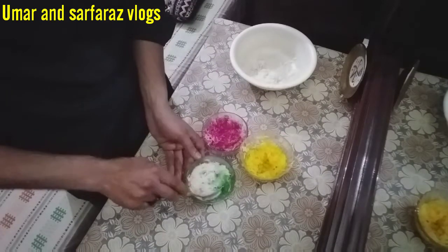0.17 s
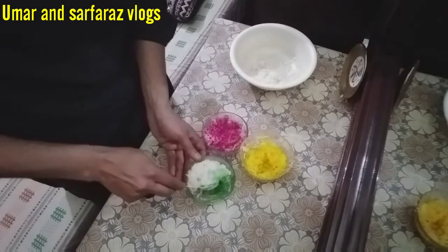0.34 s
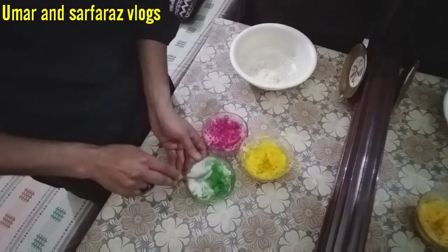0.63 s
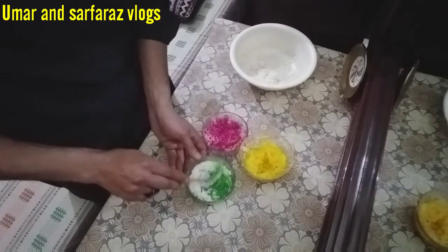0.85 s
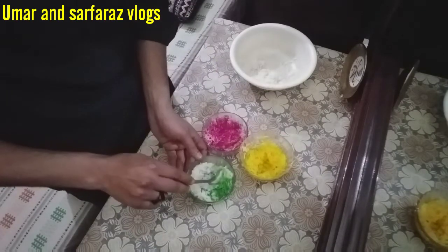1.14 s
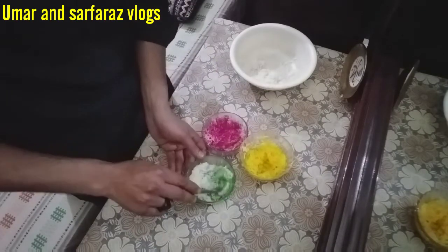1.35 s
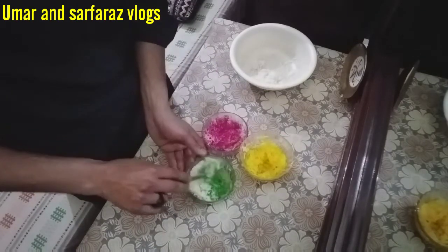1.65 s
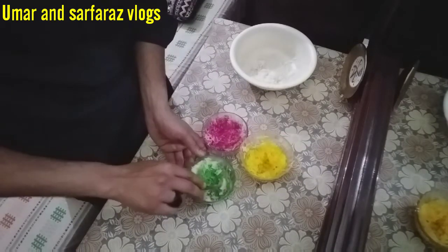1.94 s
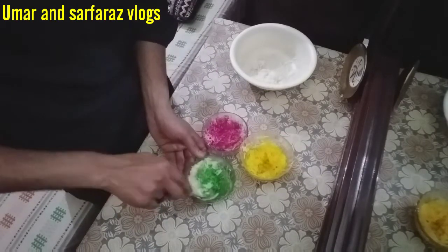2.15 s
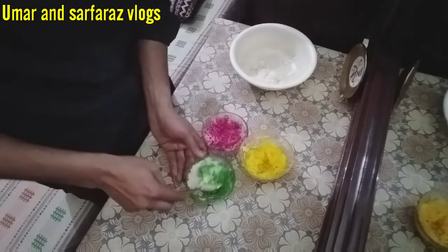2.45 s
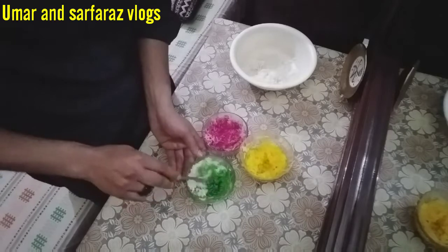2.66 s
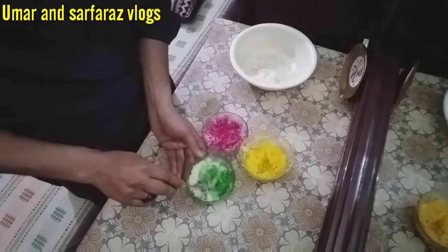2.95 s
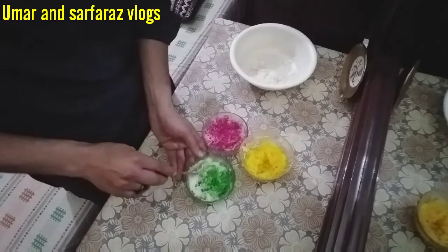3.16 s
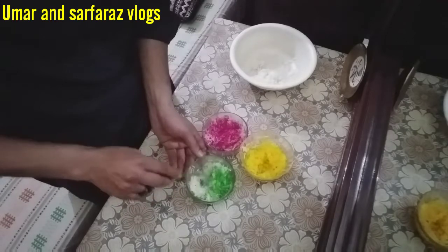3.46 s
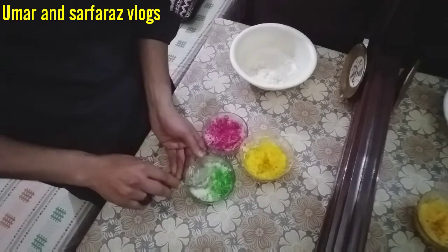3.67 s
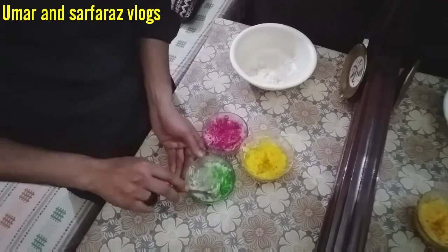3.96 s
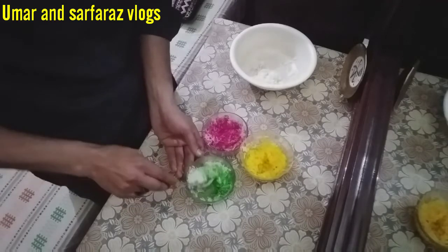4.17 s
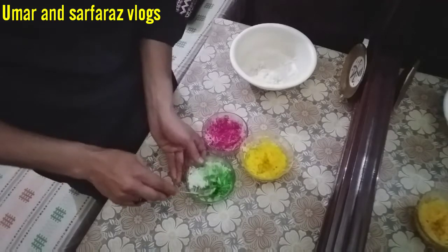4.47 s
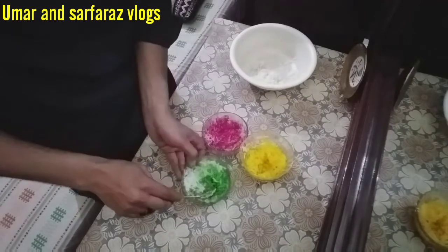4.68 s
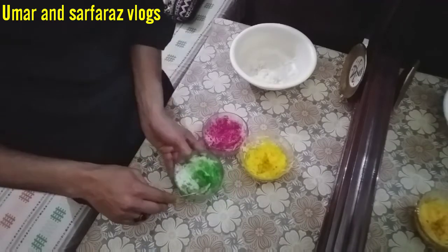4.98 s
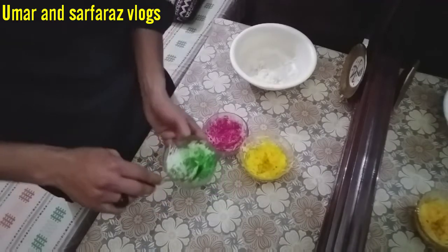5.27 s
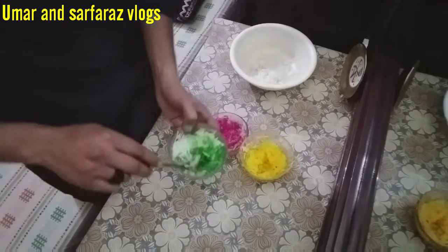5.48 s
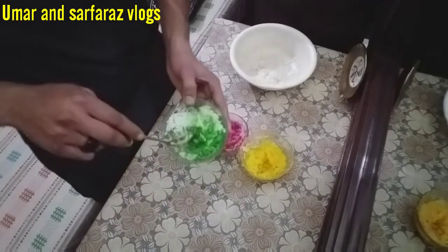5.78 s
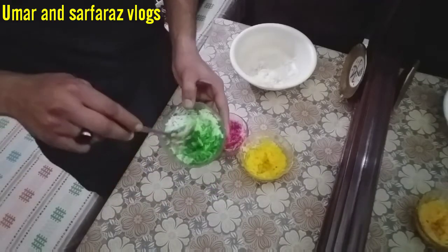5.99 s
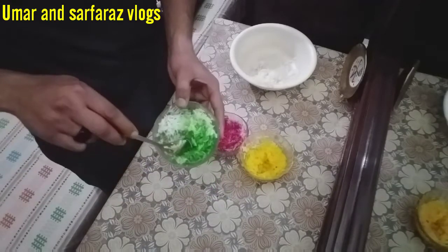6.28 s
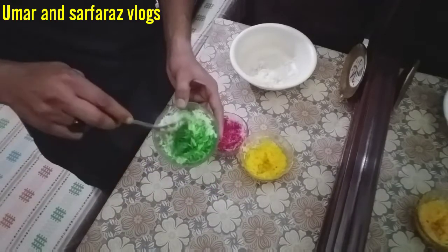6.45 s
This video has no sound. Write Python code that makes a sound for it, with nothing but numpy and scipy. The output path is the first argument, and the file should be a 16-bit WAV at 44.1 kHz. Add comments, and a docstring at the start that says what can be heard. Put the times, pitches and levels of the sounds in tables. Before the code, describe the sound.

In a small kitchen with a faint hiss and low rumble, a metal spoon clicks and clinks irregularly against a glass bowl of rice. Early on, the bowl rubs softly over a tablecloth. The clinks peak in a bright pair as glass touches glass. Then come another clink, a muffled knock on the table, brief ringing scrapes and a final sharp tap, all heard nearby with a short room echo.

```python
"""Stirring rice in a glass bowl

A steel spoon stirs rice in a small glass bowl on a cloth-covered table in a small kitchen.
Each touch cracks, rings the glass and knocks the table. The bowl is nudged over the cloth, bumps
the table and clinks against its neighbour; then it is lifted while the spoon drags along it.
A steady hiss and a low rumble lie underneath."""
import sys
import numpy as np
from scipy import signal
from scipy.fft import rfft, irfft
from scipy.io import wavfile

SR = 44100
rng = np.random.default_rng(int(sys.argv[2]) if len(sys.argv) > 2 else 0)


def put_to_file(sound):
    """Save the sound as 16-bit audio at rate SR, in the file named by the first command-line argument."""
    columns = np.atleast_2d(sound).T  # one column per channel
    safe = np.clip(columns, -1, 1)
    whole_steps = np.round(safe * 32767)
    wavfile.write(sys.argv[1], SR, whole_steps.astype(np.int16))


N = 291942
T = np.arange(SR // 2) / SR  # time axis of one hit, in seconds
ATTACK = SR // 125  # the first 8 ms of a hit, in samples


def amp(db):
    """Decibels to gain."""
    return 10 ** (np.asarray(db) / 20)


def curve_at(points, hz):
    """A curve of straight lines over log frequency, read at hz."""
    freqs, values = np.transpose(points)
    return np.interp(np.log(hz + 1), np.log(freqs + 1), values)


def unit_rms(x):
    """Scales to rms 1."""
    return x / np.sqrt(np.mean(x ** 2) + 1e-20)


def unit_attack(x):
    """Scales to rms 1 over the attack."""
    return x / np.sqrt(np.mean(x[:ATTACK] ** 2) + 1e-20)


def add(mix, start_s, sound):
    """Mixes a sound in at start_s."""
    part = mix[round(start_s * SR):][:len(sound)]
    part += sound[:len(part)]


def swell(peak_s, rise_s, fall_s):
    """An envelope that grows to 1 at peak_s and dies away."""
    t = np.arange(N) / SR - peak_s
    return np.exp(np.maximum(np.minimum(t / rise_s, -t / fall_s), -30))


def colour(x, spectrum, size=4096):
    """Minimum-phase EQ: shapes the tone with no ringing ahead of a hit."""
    log_gain = np.log(amp(curve_at(spectrum, abs(np.fft.fftfreq(size, 1 / SR)))))
    taps = np.fft.ifft(np.exp(np.conj(signal.hilbert(log_gain)))).real[:size // 2]
    return signal.fftconvolve(x, taps)[:len(x)]


def burst(spectrum, decay_s):
    """The chatter of a contact: coloured noise that dies within milliseconds."""
    return unit_attack(colour(rng.standard_normal(len(T)) * np.exp(-T / decay_s), spectrum))


def ring(modes, rise_s, length=1, scatter_db=1):
    """Dying modes, their t60 scaled by length; where the blow lands sets each one's share."""
    hz, db, t60 = np.transpose(modes)[:, :, None]
    share, phase = rng.uniform(-1, 1, hz.shape), rng.random(hz.shape)
    onset = 1 - np.exp(-T / rise_s)
    envelopes = onset * amp(db + scatter_db * share - 60 * T / (t60 * length))
    attack_power = (envelopes[:, :ATTACK] ** 2).mean(1).sum() / 2
    return (envelopes * np.sin(2 * np.pi * (hz * T + phase))).sum(0) / np.sqrt(attack_power)


# Reverb time of the kitchen: freq_hz, t60_s
ROOM_DECAY = [(150, .35), (500, 0.35), (1400, 0.34), (3700, 0.26), (7000, 0.23), (14000, 0.28)]

def kitchen(x, wet_db, predelay_s=0.0064, build_s=0.00064):
    """Adds dense reflections from near walls; their pattern changes as hand and bowl move."""
    hz, t, noise = signal.stft(rng.standard_normal(len(T)), SR, nperseg=256)
    decay = amp(-60 * t / curve_at(ROOM_DECAY, hz)[:, None])
    tail = signal.istft(noise * decay, SR, nperseg=256)[1][:len(T)]
    tail *= 1 - np.exp(-np.maximum(T - predelay_s, 0) / build_s)
    return x + amp(wet_db) * signal.fftconvolve(x, tail / np.linalg.norm(tail))[:len(x)]


# Bed of hiss and rumble: freq_hz, level_db
HISS_SPECTRUM = [(25, -25.5), (50, -13), (100, -1.5), (170, -10.5), (420, -16), (800, -15), (1300, -15),
                 (1650, -12.5), (2050, -4.5), (2900, -2.5), (4000, -7), (7600, -14), (9000, -23.5),
                 (16000, -26)]
# Narrow bands of hum and whine in the bed: centre_hz, width_hz, level_db
HISS_HUMPS = [(110, 51, -69), (2692, 180, -61), (3146, 98, -64.5), (3260, 18, -63.5)]

def hiss(sag_db=-3, sag_at_s=4.41, sag_width_s=0.58):
    """Steady hiss and rumble with a few narrow humps; the level sinks once and comes back."""
    hz, t = np.fft.rfftfreq(N, 1 / SR), np.arange(N) / SR

    def noise(gain):
        return unit_rms(irfft(rfft(rng.standard_normal(N)) * gain, N))

    wide = noise(amp(curve_at(HISS_SPECTRUM, hz)))
    humps = sum(amp(level_db) * noise(1 / (1 + (2 * (hz - centre_hz) / width_hz) ** 2))
                for centre_hz, width_hz, level_db in HISS_HUMPS)
    sag = amp(sag_db * np.exp(-((t - sag_at_s) / sag_width_s) ** 2))
    return sag * (amp(-58.5) * wide + amp(-2.5) * humps)


# Nudges of the bowl: peak_s, level_db
NUDGES = [(0.59, -40.5), (0.647, -41), (0.728, -45.5), (0.82, -57)]
# Muffled rub of glass on cloth: freq_hz, level_db
CLOTH_SPECTRUM = [(40, -32), (90, 8.5), (130, 12.5), (190, -3), (300, -2.5), (420, -20), (700, -49),
                  (3000, -73)]

def cloth_rub():
    """The bowl's foot judders over the cloth with each nudge."""
    envelope = sum(amp(db) * swell(peak_s, rise_s=0.016, fall_s=0.021) for peak_s, db in NUDGES)
    return amp(-6) * envelope * unit_rms(colour(rng.standard_normal(N), CLOTH_SPECTRUM))


# Low resonances of the table top: pitch_hz, level_db, t60_s
TABLE_MODES = [(121, -13, .22), (166, -9, .13), (200, -9, .1), (243, -5, .12), (279, 1, .19),
               (366, -10, .12), (408, -9, .1), (560, -13, .06), (630, -12, .08)]

def table_knock(length=1):
    """The table top answers a blow with a soft-edged knock."""
    return ring(TABLE_MODES, rise_s=0.002, length=length)


# The bowl bumping the table: start_s, level_db, contact_s
BUMPS = [(1.682, -39, 0.0047), (5.106, -33, 0.0011), (5.11, -20, 0.0019), (5.677, -59, 0.0052)]
# Tone of a thud: freq_hz, level_db
THUD_SPECTRUM = [(30, -41.5), (70, -13), (120, -9), (180, -1), (280, -4.5), (420, -7), (600, -7.5),
                 (900, -13), (2000, -18), (8000, -95)]

def bowl_bumps():
    """Thuds through the cloth: a push, a judder, the table's ring; longer contacts sound duller."""
    out = np.zeros(N)
    push = unit_attack(colour(signal.unit_impulse(len(T)), THUD_SPECTRUM))
    for start_s, level_db, contact_s in BUMPS:
        judder = amp(-9) * burst(THUD_SPECTRUM, decay_s=0.009)
        thud = push + judder + amp(-5) * table_knock(length=0.7)
        band = signal.butter(2, [70, 1 / contact_s], "bandpass", fs=SR)
        muffled = unit_attack(signal.lfilter(*band, thud))
        add(out, start_s, kitchen(amp(level_db) * muffled, wet_db=-9))
    return out


# Ring of the neighbouring bowl: pitch_hz, level_db, t60_s
NEIGHBOUR_MODES = [(2465, 0, .19), (3475, -3, .15), (4740, 0, .22), (4990, -5, .2), (6440, -8, .1)]
# Bowl against bowl: start_s, level_db, favoured_hz
TOUCHES = [(1.617, -39, 5200), (3.731, -25.5, 3340), (5.0685, -23.5, 3240)]

def neighbour_bowl(octave_away_db=-16):
    """The bowl is knocked into its neighbour; the point of contact favours modes near one pitch."""
    out = np.zeros(N)
    for start_s, level_db, favoured_hz in TOUCHES:
        modes = [(hz, db + octave_away_db * np.log2(hz / favoured_hz) ** 2, t60)
                 for hz, db, t60 in NEIGHBOUR_MODES]
        glass = amp(level_db) * ring(modes, rise_s=0.0006, length=0.4)
        add(out, start_s, kitchen(glass, wet_db=-5.5))
    return out


# The rice bowl's three main modes, each a close cluster, and its top shimmer: pitch_hz, level_db, t60_s
GLASS_LOW = [(2409, 0, .22), (2436, -12, .15), (2360, -8, .04)]
GLASS_MID = [(4535, 0, .2), (4580, -3, .16), (4640, -1, .035), (4800, -5, .04)]
GLASS_HIGH = [(6778, 0, .21), (6878, -7, .18), (6700, -1, .04)]
GLASS_SHIMMER = [(8400, -2, .12), (9250, -1, .11), (10660, -2, .11), (12130, 1, .13), (12310, -6, .1),
                 (14550, -8, .1), (15430, -12, .1)]

def glass_ring(ring_db, tilt_db, treble_db, length):
    """The struck bowl rings and beats, only briefly while the spoon stays on it."""
    clusters = [(GLASS_LOW, -1 - tilt_db), (GLASS_MID, 1.5), (GLASS_HIGH, -3 + tilt_db)]
    body = sum(amp(ring_db + db) * ring(modes, rise_s=0.0006, length=length) for modes, db in clusters)
    # only a hard blow on the free rim wakes the highest modes
    shimmer_db = -7.5 + (treble_db + ring_db + tilt_db) / 2
    return body + amp(shimmer_db) * ring(GLASS_SHIMMER, rise_s=0.0005, length=length, scatter_db=5)


# The hard contact in three registers, from body to sizzle: freq_hz, level_db
LOW_CRACK_SPECTRUM = [(60, -39), (300, -19.5), (650, 1.5), (1100, -10), (1550, 4), (1900, -6),
                      (2800, -35.5), (6000, -39.5)]
CRACK_SPECTRUM = [(1500, -15), (2200, -0.5), (3300, -0.5), (4700, 4), (5600, -4), (7000, 1.5), (8300, -7),
                  (9200, -43), (16000, -26)]
FIZZ_SPECTRUM = [(5000, -17.5), (8000, 1), (11000, -2.5), (16000, -9.5)]
# Ring of the spoon, damped by the fingers: pitch_hz, level_db, t60_s
SPOON_MODES = [(1500, -17, .025), (1740, -14, .025), (2560, -3, .02), (3270, -1, .022), (4090, -6, .012),
               (4720, 0, .022), (5400, -6, .018), (6420, -3, .022), (7700, -6, .02)]

def contact_crack(force_db, treble_db, knock_db):
    """The crack of a hit on glass, with a brief ring of steel; duller where rice cushions the blow."""
    chatter_s = 0.0032 * 2 ** ((force_db + 32) / 19)  # a harder blow chatters longer
    low_db = -14 + 0.58 * force_db + 0.16 * (force_db + knock_db)
    crack = amp(force_db + 1) * burst(CRACK_SPECTRUM, chatter_s)
    crack += amp(low_db) * burst(LOW_CRACK_SPECTRUM, 1.58 * chatter_s)
    fizz = amp(force_db + treble_db - 2) * burst(FIZZ_SPECTRUM, 1.3 * chatter_s)
    steel = amp(force_db - 3.5) * ring(SPOON_MODES, rise_s=0.0002, scatter_db=5)
    cutoff_hz = np.clip(4200 * 2 ** ((treble_db + 20.5) / 6.5), 1000, 20000)
    rice_cushion = signal.butter(2, cutoff_hz, fs=SR)
    return signal.lfilter(*rice_cushion, crack + steel) + fizz


# Scrapes of the spoon in the lifted bowl: peak_s, level_db, rise_s
SCRAPES = [(5.463, -39, 0.013), (5.608, -44.5, 0.042), (5.648, -41.5, 0.011), (5.734, -43, 0.01),
           (5.785, -46, 0.0023), (5.894, -44, 0.0094)]

def spoon_drag(slips_per_s=350):
    """Tiny slips of the spoon keep the glass faintly ringing."""
    envelope = sum(amp(db) * swell(peak_s, rise_s, fall_s=0.009) for peak_s, db, rise_s in SCRAPES)
    slips = unit_rms(rng.standard_normal(N) * (rng.random(N) < slips_per_s / SR))
    clusters = [(GLASS_LOW, -5), (GLASS_MID, 0), (GLASS_HIGH, -1.5), (GLASS_SHIMMER, -8)]
    tick = sum(amp(db) * ring(modes, rise_s=0.0005, length=0.35) for modes, db in clusters)
    tick += amp(7.5) * burst(CRACK_SPECTRUM, decay_s=0.0045)
    tick += amp(-23) * burst(FIZZ_SPECTRUM, decay_s=0.0027)
    return amp(-3) * signal.fftconvolve(slips * envelope, tick / np.linalg.norm(tick))[:N]


# Sharp hits on the glass bowl, from the spoon or the neighbouring bowl:
# start_s, force_db, treble_db, ring_db, tilt_db, knock_db, length_ratio
# Treble, ring and knock are relative to the force; a positive tilt brightens the ring.
CLINKS = [(0.2296, -29, -2.5, 7, -0.5, -10, 0.18), (0.2487, -36.5, -8, -20, 0, -10, 0.28),
          (1.091, -39, -7.5, 5, -6.5, -12.5, 0.79), (1.5893, -27, -5.5, -6, -9.5, -10, 0.37),
          (1.617, -27.5, -13, -28, 2, -17, 0.59), (1.6858, -42.5, -18, -26, -5, -3.5, .5),
          (2.1133, -29.5, -4.5, -5, -9.5, -7.5, 0.38), (2.2322, -47.5, -10.5, -12, -13, -0.5, 0.56),
          (2.404, -55, -4.5, 4.5, -1, -35, 0.12), (3.0058, -31.5, -21.5, -21, -4.5, -19, 0.34),
          (3.3984, -25, -19.5, -9.5, -2.5, -20.5, .25), (3.455, -35.5, -24.5, -18, -13, -9, 0.11),
          (3.7018, -21, -6.5, 1.5, 3.5, -21.5, 0.37), (3.731, -18, -17, -10, 8, -37.5, 0.39),
          (4.2694, -29.5, -21, -19, -1, -20.5, .4), (5.0648, -29, -16, -11, 10, -11, 0.24),
          (5.0684, -27, -10.5, -9.5, 5, -15.5, 0.44), (5.4179, -36.5, -3.5, 3.5, 0, -37, 0.2),
          (5.6082, -54, -2.5, 8.5, 1, -25, 0.26), (6.262, -23.5, -9.5, 3, -1, -38.5, 0.2),
          (6.357, -47, -7, 6.5, -3.5, -35, .36)]

def clinks():
    """Each hit on the bowl cracks, rings the glass and knocks through the table."""
    out = np.zeros(N)
    for start_s, force_db, treble_db, ring_db, tilt_db, knock_db, length_ratio in CLINKS:
        contact = contact_crack(force_db, treble_db, knock_db)
        glass = amp(force_db) * glass_ring(ring_db, tilt_db, treble_db, length_ratio)
        knock = amp(force_db + knock_db) * table_knock()
        add(out, start_s, kitchen(contact, wet_db=-7.5) + kitchen(glass + knock, wet_db=-8))
    return out


def scene():
    """Spoon, bowls and table in the kitchen, over the hiss, in mono."""
    hits = clinks() + neighbour_bowl() + bowl_bumps()
    friction = kitchen(cloth_rub() + spoon_drag(), wet_db=-14.5)
    return (hits + friction + hiss())[None]


def record(dry):
    """A steep high cut at 16 kHz."""
    high_cut = signal.firwin(255, 16000, window=("kaiser", 9), fs=SR)
    return signal.oaconvolve(dry, high_cut[None], "same")


dry = scene()
out = record(dry)
put_to_file(out)
```